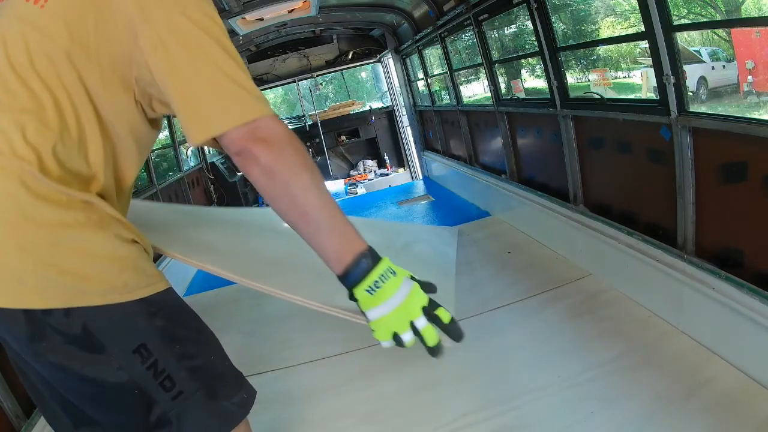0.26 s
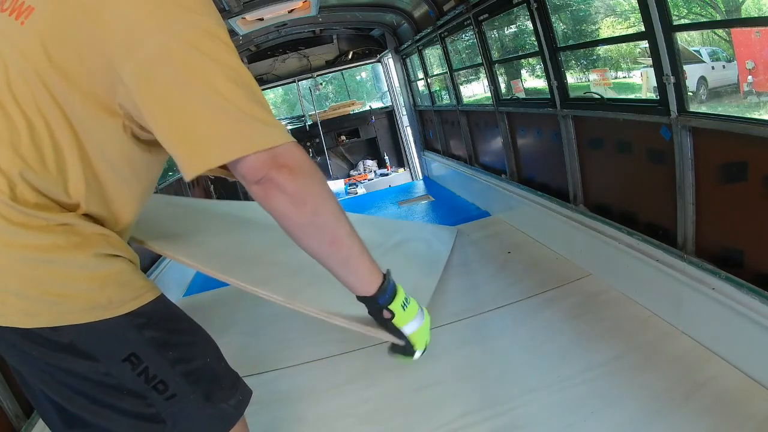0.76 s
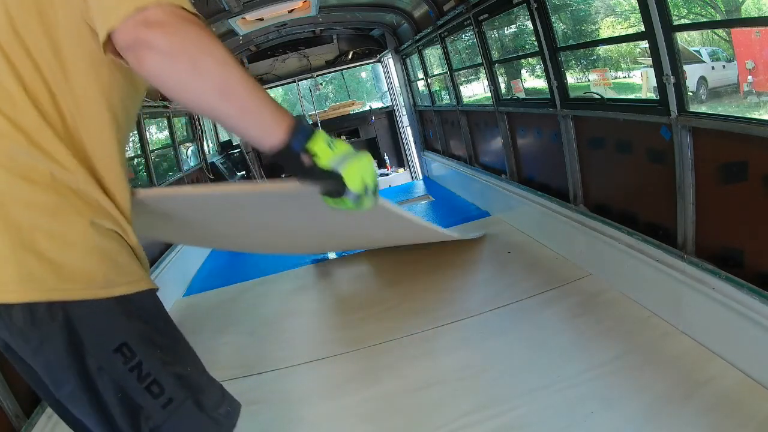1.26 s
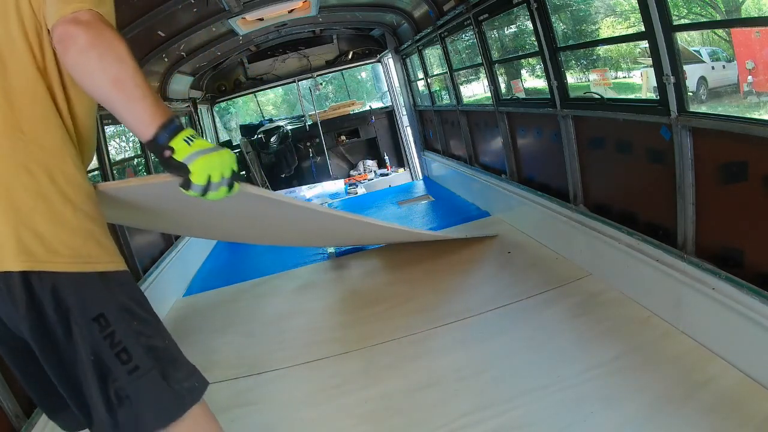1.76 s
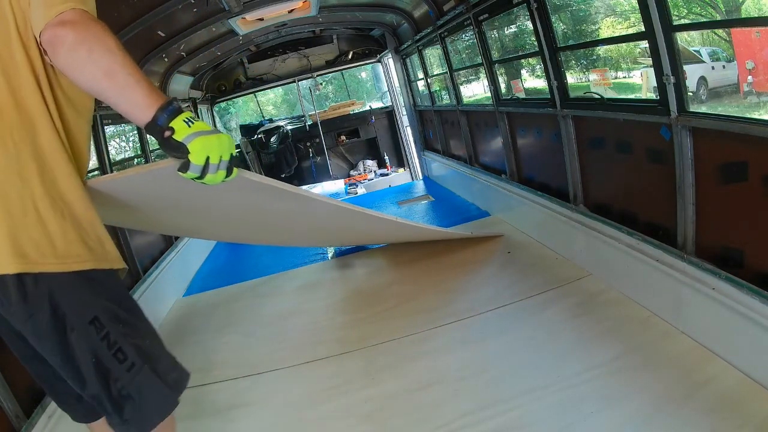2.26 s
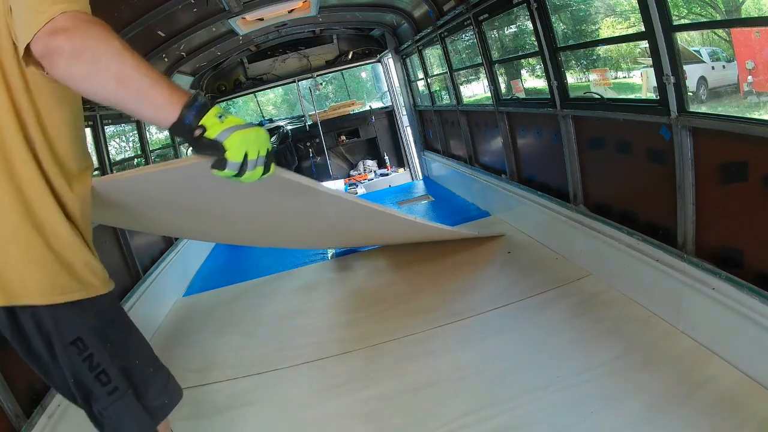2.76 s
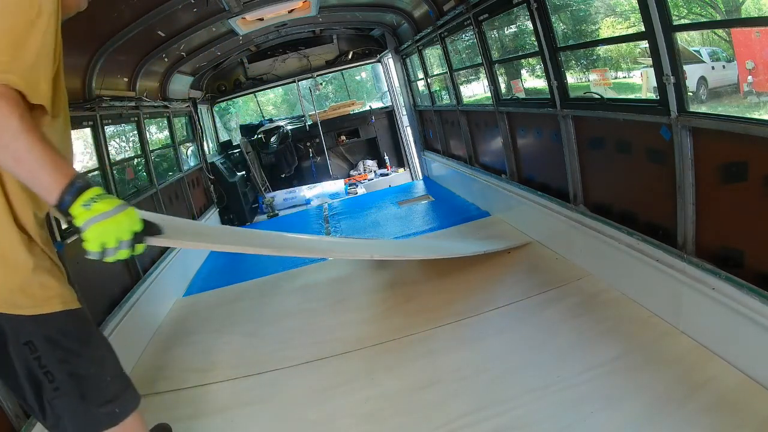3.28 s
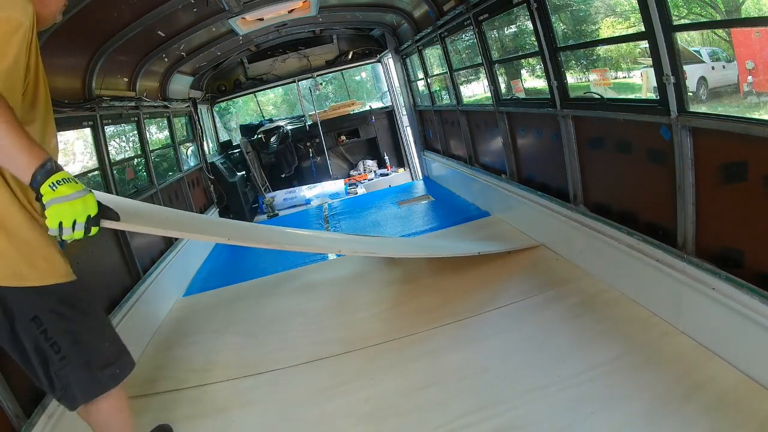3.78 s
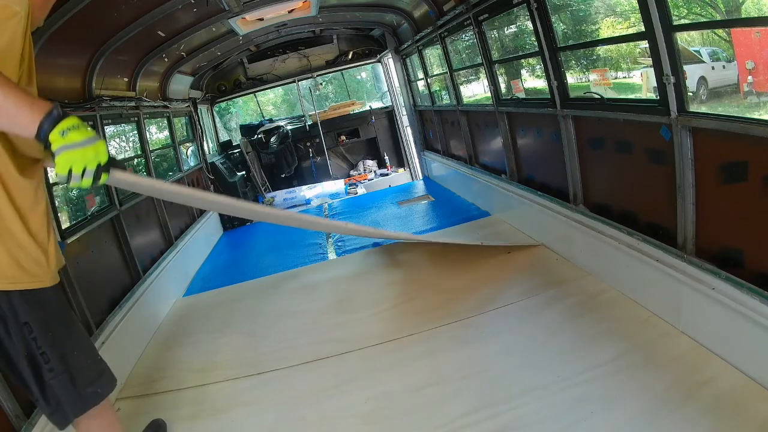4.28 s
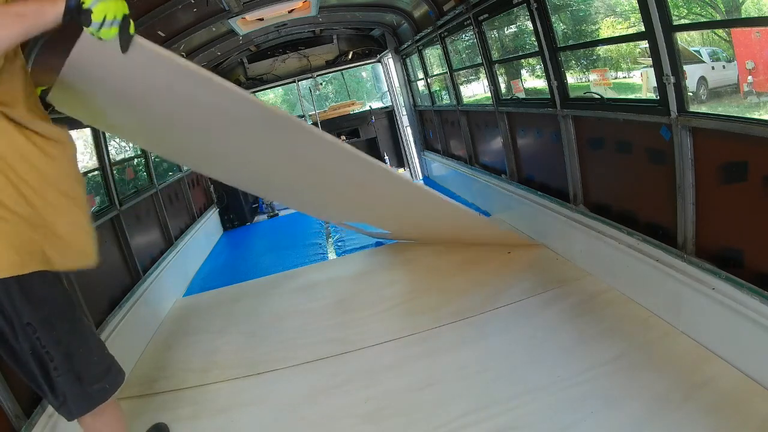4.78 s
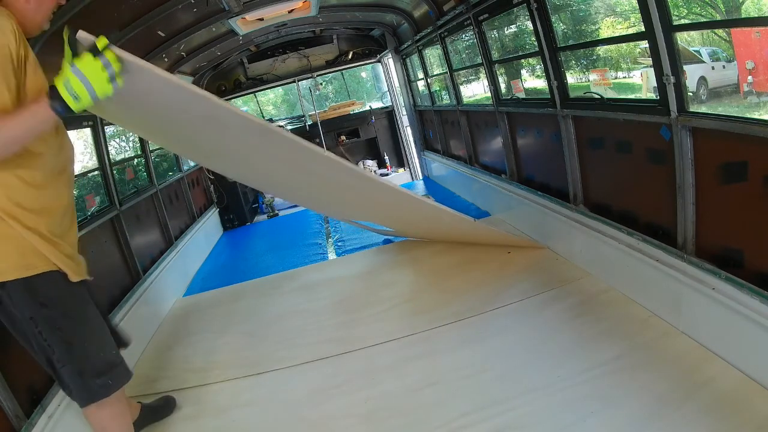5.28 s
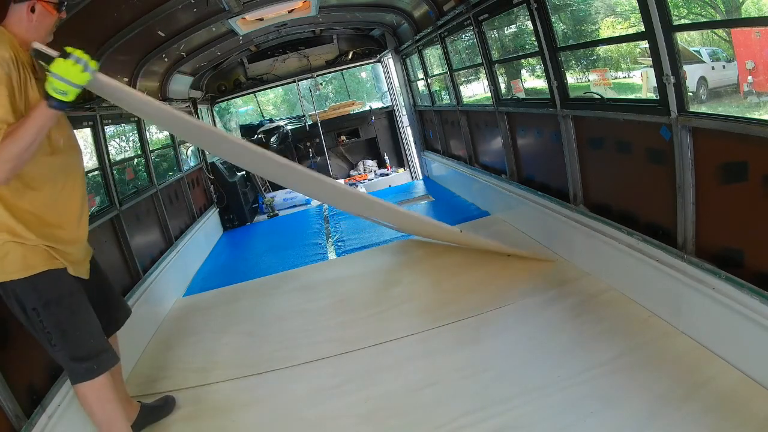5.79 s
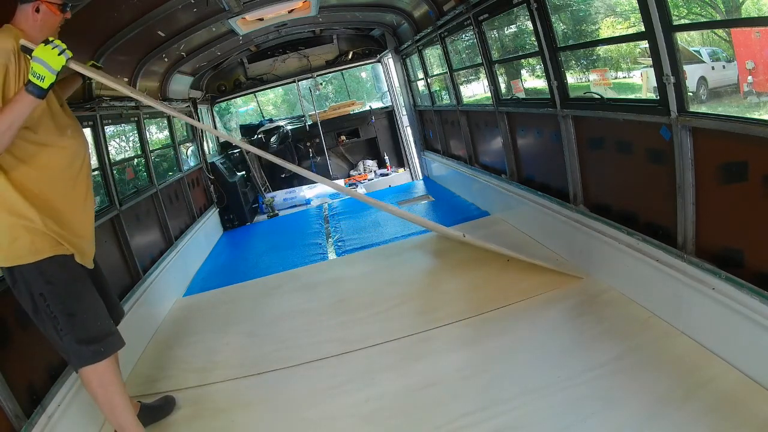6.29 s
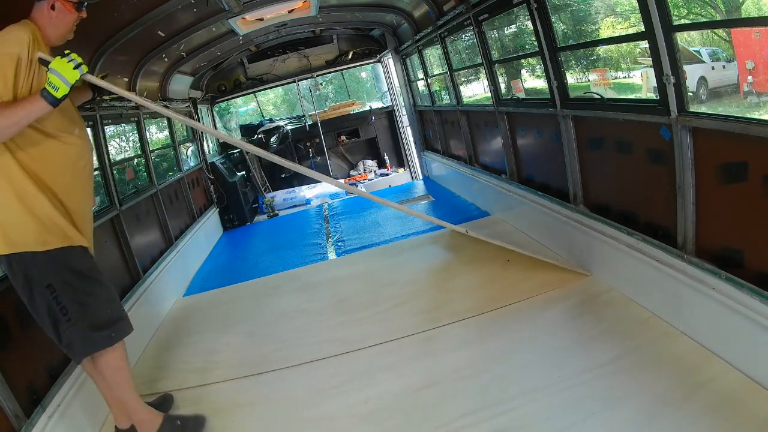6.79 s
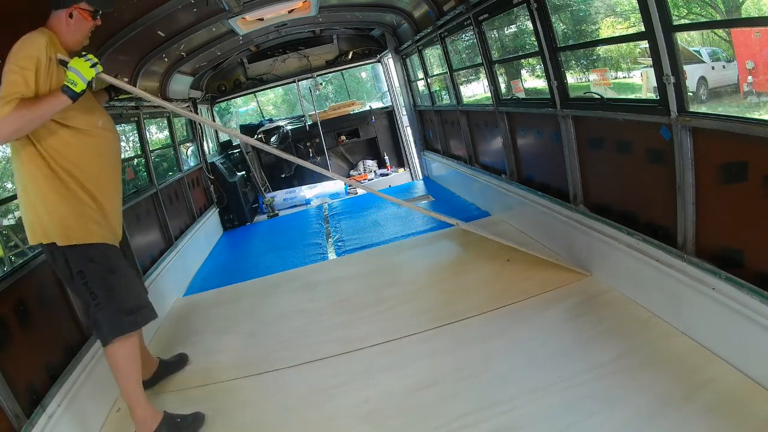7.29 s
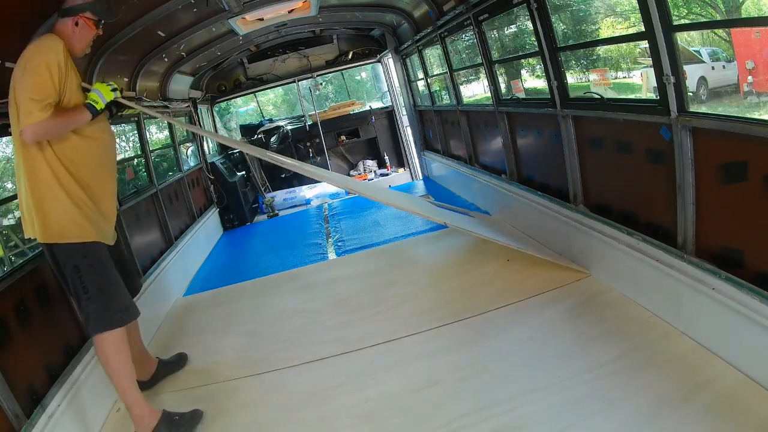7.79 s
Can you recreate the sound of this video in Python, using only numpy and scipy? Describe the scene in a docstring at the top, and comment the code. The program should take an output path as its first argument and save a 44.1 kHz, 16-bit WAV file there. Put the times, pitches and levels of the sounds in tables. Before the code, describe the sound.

A thin plywood sheet is worked across a plywood floor in a stripped steel bus, heard from a metre or two away, centred, with short dense reflections and a faint steady bed of air. For the first second there is only very light rubbing and a tiny gritty tick at 0.6. At about 1.2-1.3 the sheet lands with a fast chattering slap and a short scrape. Soft, uneven fibrous strokes continue to 3.0, when one swells into a muffled hollow thump at 3.3. It stays quiet until a scrape at 4.7 and small catches around 5.1. From 5.55 the loudest rubbing surges, with a solid knock at 5.8 and a deep thump and crackle at 6.0. Softer rubbing strokes follow, with snags near 6.95, wooden knocks at 7.2-7.35 and 7.65, and a faint last tap at 8.0.

```python
"""Fibrous rubbing in uneven strokes over a faint air bed, with slaps, knocks and soft low thumps among it.
A thin plywood sheet is bent and dragged over the plywood floor of a stripped bus, a metre or two away.
Random grains of contact, coloured and enveloped, make the rubbing; filtered contacts make the blows,
which ring the modes of sheet and floor. The bare steel cabin answers with short dense reflections."""
import sys
import numpy as np
from scipy import signal
from scipy.fft import rfft, irfft, next_fast_len
from scipy.io import wavfile
from scipy.ndimage import uniform_filter1d

SR = 44100
rng = np.random.default_rng(int(sys.argv[2]) if len(sys.argv) > 2 else 0)


def log_audio(samples):
    """Write samples as a 16-bit WAV file to the path given in sys.argv[1]."""
    # one column per channel
    frames = np.atleast_2d(samples).T
    # limit to full scale, then quantise
    limited = np.clip(frames, -1, 1)
    pcm = np.round(limited * 32767).astype(np.int16)
    wavfile.write(sys.argv[1], SR, pcm)


N = 355005
TIME = np.arange(N) / SR  # s

# Ringing modes of the sheet: mode_hz, relative_level_db, t60_s
SHEET_MODES = [(158, 0, 0.36), (212, -1.5, 0.083), (230.3, 6.5, 0.23), (291.5, -1.5, 0.32),
               (354.5, -7, 0.23), (395, 8, 0.074), (450, 1, 0.12), (553, 6, 0.031), (628, 6.5, 0.094),
               (730, 3, 0.065), (890, -2, 0.26), (1015, -9.5, 0.34), (1120, 3.5, 0.21), (1350, -32, 0.37),
               (1600, -12, .22), (1800, -7, .22), (1908, 2.5, 0.29), (2500, -14, 0.22), (2810, 13, .18),
               (3200, -10, .18)]


def undb(db):
    """Decibels to gain."""
    return 10 ** (np.asarray(db) / 20)


def unit(x):
    """Scale to an energy of one."""
    return x / np.sqrt(np.sum(x ** 2))


def colour(x, points):
    """Shape the spectrum of a steady sound by (Hz, dB) points, log-frequency interpolation; rms 1."""
    hz, db = np.transpose(points)
    size = next_fast_len(N)
    f = np.maximum(np.arange(size // 2 + 1) * SR / size, 1)
    gain = undb(np.interp(np.log(f), np.log(hz), db))
    shaped = irfft(rfft(x, size) * gain, size)[:N]
    return unit(shaped) * np.sqrt(N)


def cut(x, hz, kind, order=2):
    """Butterworth low-pass or high-pass."""
    sos = signal.butter(order, min(hz, SR / 2 - 1000), kind, fs=SR, output="sos")
    return signal.sosfilt(sos, x)


def add(track, start_s, x):
    """Mix x into the track from start_s, or from zero if that is negative."""
    i = max(int(start_s * SR), 0)
    track[i:i + len(x)] += x[:max(N - i, 0)]


def walk(rate_hz):
    """Random levels, each held 1 / rate_hz seconds, slewed twice; spread near 1."""
    k = int(SR / rate_hz)
    held = np.repeat(rng.standard_normal(N // k + 1), k)
    slewed = uniform_filter1d(uniform_filter1d(held, k), k)
    return np.sqrt(2) * slewed[:N]


def grains(size, per_s, spread_db):
    """Tiny contacts at random moments, of very unequal strength."""
    hit = rng.random(size) < per_s / SR
    contacts = rng.standard_normal(size) * hit
    contacts[hit] *= undb(spread_db * rng.standard_normal(size)[hit])
    return contacts


def through(x, response):
    """Pass a sound through an impulse response."""
    return signal.oaconvolve(x, response)[:N]


def ringing(modes, ring_db):
    """Impulse response of a panel: the contact itself plus exponentially decaying modes."""
    t = TIME[:SR]
    response = np.zeros(len(t))
    for hz, db, t60_s in modes:
        mode = np.cos(2 * np.pi * hz * t) * np.exp(-np.log(1000) * t / t60_s)
        response += undb(ring_db + db) * unit(mode)
    response[0] += 1
    return response


def disperse(x, travel=0.0695):
    """Bending waves cross the sheet in travel / sqrt(Hz) seconds: highs arrive first, bass trails."""
    f = np.fft.rfftfreq(len(x), 1 / SR)
    phase = 2 * np.pi * 2 * travel * np.sqrt(f)  # its slope is the delay
    return irfft(rfft(x) * np.exp(-1j * phase), len(x))


def cabin(low_t60_s=0.41, high_t60_s=0.25, wet_db=2.0, build_s=0.00026):
    """Dense reflections off the near walls of the bus, from one spot; the treble dies first."""
    t = TIME[:SR // 2]
    response = np.zeros(len(t))
    edges_hz = np.geomspace(40, 18000, 19)
    t60s = np.linspace(low_t60_s, high_t60_s, len(edges_hz))
    noise = rfft(rng.standard_normal(len(t)))
    f = np.fft.rfftfreq(len(t), 1 / SR)
    for lo, hi, t60_s in zip(edges_hz, edges_hz[1:], t60s):
        band = irfft(noise * ((f >= lo) & (f < hi)), len(t))
        band *= np.exp(-np.log(1000) * t / t60_s) * (1 - np.exp(-t / build_s))
        response += unit(band) * np.sqrt(2 * (hi - lo) / SR)  # energy in proportion to bandwidth
    return response * undb(wet_db)


def in_cabin(x, spot):
    """A sound and its reflections."""
    heard = signal.oaconvolve(x, spot)
    heard[:len(x)] += x
    return heard


def air(level_db=-61):
    """Steady coloured noise: faint outdoor air through the windows, and microphone hiss."""
    # Spectrum: freq_hz, relative_level_db
    air_colour = [(25, -18), (60, -12.5), (130, -2), (300, 4), (700, 2.5), (1400, 0), (3000, -2),
                  (8000, -10.5), (11000, -9.5), (16000, -12)]
    return colour(rng.standard_normal(N), air_colour) * undb(level_db)


def scuffs(spot, trim_db=-1, below=0.42, above=1.37, rise=0.28):
    """Grit and splinters catch: short bright bursts of crackle where the edge snags."""
    # Snags: start_s, level_db (before trim), centre_hz, decay_s (time constant)
    snags = [(0.618, -23.5, 9200, 0.0003), (.624, -25.5, 8800, 0.016), (3.31, -25, 7000, 0.01),
             (3.771, -20, 7300, 0.015), (5.156, -18.5, 7260, 0.0059), (5.994, -17, 4930, 0.0098),
             (6.949, -20.5, 3500, .005), (6.984, -21, 5000, 0.0066)]
    track, t = np.zeros(N), TIME[:SR // 4]
    for start_s, db, hz, decay_s in snags:
        envelope = np.exp(-t / decay_s) * (1 - np.exp(-t / (rise * decay_s)))
        crackle = grains(len(t), 5500, 3.3) * envelope
        snag = cut(cut(crackle, hz * below, "high", order=2), hz * above, "low", order=6)
        add(track, start_s, undb(db + trim_db) * unit(in_cabin(snag, spot)))
    return track


def thumps(spots, ring_db=-33, bass_hz=45):
    """The bowed sheet pushes softly on the hollow floor, then wobbles on, fainter and longer, a low shudder."""
    # Flexing or settling panel: start_s, level_db (before floor response), treble_corner_hz, decay_s
    flexes = [(1.273, -23, 115, 0.033), (2.059, -36, 298, 0.025), (3.315, -13.5, 430, 0.058),
              (3.33, -27, 120, .04), (3.821, -35.5, 200, 0.03), (4.951, -31, 250, .04),
              (5.994, -9.5, 615, 0.023), (6.025, -12, 293, 0.041)]
    # Hollow floor modes: mode_hz, relative_level_db, t60_s
    floor_modes = [(77, -2, 1), (118.2, -6, 0.85), (147.6, -10, 0.36), (244, 4.5, 0.15), (370, -3, 0.19)]
    wobble_re_thump_db, wobble_hz, wobble_s = -17.5, 133, 0.22
    track, t = np.zeros(N), TIME[:SR]
    for k, (start_s, thump_db, thump_hz, thump_s) in enumerate(flexes):
        thump = thump_db, thump_hz, thump_s
        wobble = thump_db + wobble_re_thump_db, wobble_hz, wobble_s
        for db, treble_hz, decay_s in (thump, wobble):
            shudder = grains(len(t), 1100, 2.8) * np.exp(-t / decay_s)
            push = cut(cut(shudder, treble_hz, "low", order=4), treble_hz / 2, "high", order=1)
            add(track, start_s, undb(db) * unit(in_cabin(push, spots[k % len(spots)])))
    return through(cut(track, bass_hz, "high", order=1), ringing(floor_modes, ring_db))


def knocks(spots, trim_db=2, ring_db=-31):
    """The long edge lands and chatters; each strike has its own loudness, brightness, bass and chatter."""
    # Edge strikes: start_s, level_db (before trim and ringing), treble_corner_hz, bass_corner_hz,
    # chatter_db (re first touch)
    strikes = [(1.208, -26.5, 700, 200, 2), (1.236, -22, 1000, 400, 21), (1.271, -5, 1000, 165, 4),
               (1.281, -2.5, 2190, 195, 6), (1.292, -0.5, 1520, 610, 11.5), (1.374, -24, 1000, 210, -10),
               (3.767, -29, 603, 430, 2), (4.112, -27, 4000, 700, 4), (5.135, -28, 600, 250, 7),
               (5.165, -28.5, 900, 300, -8), (5.22, -29, 700, 400, -10), (5.779, -2, 1860, 180, 3),
               (5.992, -11.5, 1520, 500, 2), (6.809, -23, 940, 420, 1), (7.144, -24.5, 804, 280, 8),
               (7.211, -13.5, 2200, 324, -11), (7.332, -8, 1880, 162, 2.5), (7.36, -12.5, 800, 260, 3),
               (7.632, -7, 2600, 174, -1.5), (7.674, -20.5, 796, 135, 18), (8.034, -19, 736, 278, 11)]
    chatter_s = 0.014  # decay time constant
    crack_db, crack_hz = -4.5, 5200  # re blow before sharpness scaling; upper corner
    hard_hz = 2000  # treble corner of a hard blow
    track, t = np.zeros(N), TIME[:SR // 4]
    touch = signal.unit_impulse(len(t))
    for k, (start_s, db, treble_hz, bass_hz, chatter_db) in enumerate(strikes):
        chatter = unit(grains(len(t), 3000, 2.3) * np.exp(-t / chatter_s))
        force = disperse(touch + undb(chatter_db) * chatter)
        blow = cut(cut(force, treble_hz, "low", order=3), bass_hz, "high", order=5)
        crack = cut(cut(touch, crack_hz, "low", order=6), treble_hz, "high", order=1)
        # bright blows with little chatter crack most
        sharpness = treble_hz / (treble_hz + hard_hz) / np.hypot(1, undb(chatter_db))
        contact = unit(blow) + undb(crack_db) * sharpness * unit(crack)
        add(track, start_s, undb(db + trim_db) * unit(in_cabin(contact, spots[k % len(spots)])))
    return through(track, ringing(SHEET_MODES, ring_db))


def strokes():
    """Envelopes of rubbing, hiss and drone: each stroke sets in, swells or eases, and coasts to a stop."""
    # Pushes and pulls of the edge: start_s, length_s, mid_level_db (before layer trims),
    # swell_db (start to end), hiss_db and drone_db (re rubbing, before layer trims)
    moves = [(-0.055, .3, -63, 1.5, 2, -5.5), (.25, .15, -71, -4, 2, -1), (0.622, 0.17, -65.5, -7, -3, -6),
             (0.782, 0.38, -56.5, 4.5, 0.5, -5.5), (1.194, 0.17, -41, -10, -9, 1.5),
             (1.313, 0.2, -50.5, -11, -4.5, -6), (1.493, 0.33, -60, -10, -4.5, -5.5),
             (1.779, 0.18, -51.5, 2, -5.5, -6), (1.982, 0.056, -54, 1.5, 2, -5),
             (2.131, .1, -51, -4, 1, -4), (2.25, .1, -63, -2, -5, -1), (2.452, 0.31, -58.5, 6.5, -4, -5.5),
             (2.752, 0.37, -49.5, -0.5, -5.5, -1), (3.065, 0.26, -44.5, 12, -6.5, -6.5),
             (3.366, .1, -49, 0, -4, -8), (3.538, 0.033, -54.5, 1, 2.5, -6), (3.88, 0.2, -67.5, 9, -0.5, 3),
             (4.06, 0.35, -60, 4, -4.5, -3.5), (4.473, 0.25, -64.5, 10, -3.5, -7),
             (4.684, .23, -47, -6, -6, -1), (4.93, .08, -59, 0, -4, -5), (5, 0.07, -50, -2.5, 1, -2.5),
             (5.099, 0.073, -46.5, -3, -5, -1.5), (5.229, 0.15, -55.5, -9, -2, -8),
             (5.39, 0.19, -66, 9, -3, -1), (5.549, 0.25, -39, 5.5, -6, -4),
             (5.78, 0.22, -32.5, -3.5, -6.5, -8.5), (6.147, 0.31, -53.5, -4, -4.5, -4.5),
             (6.396, 0.23, -47.5, 1.5, -4, -2), (6.658, 0.11, -58, 7, -2, -4.5),
             (6.756, 0.22, -51.5, -2.5, -1, -2.5), (7.005, 0.35, -51, 10.5, -4.5, 0),
             (7.332, .39, -50, -1, -2, -3), (7.703, 0.42, -54, 5, -.5, -6)]
    attack_s, release_s = 0.064, 0.037
    creep_db = [-73, -71, -73]  # rubbing, hiss, drone, before trims: the edge never quite rests
    power = np.outer(undb(creep_db) ** 2, np.ones(N))
    for start_s, length_s, db, swell_db, hiss_db, drone_db in moves:
        t = TIME[:SR] + max(-start_s, 0)  # a negative start is already under way
        shape = np.clip(t / attack_s, 0, 1) * np.exp(-np.maximum(t - length_s, 0) / release_s)
        swell = swell_db * (np.clip(t / length_s, 0, 1) - 0.5)
        strength = shape * undb(db + swell)
        for layer, share in zip(power, undb([0, hiss_db, drone_db])):
            add(layer, start_s, (strength * share) ** 2)
    return np.sqrt(power)


def sliding(spots, catch_db=1.07, rub_trim_db=-3.5, hiss_trim_db=-3.5, drone_trim_db=-7.0):
    """Wood fibres catch and let go thousands of times a second; a pressed edge shakes the whole panel."""
    # Spectra of the rubbing, its fine hiss and the shaken panel: freq_hz, relative_level_db
    rub_colour = [(150, -53), (500, -13.5), (1000, -2.5), (1800, 1), (3400, 2.5), (4400, -2.5), (6000, -10),
                  (9000, -12), (13000, -57)]
    hiss_colour = [(2000, -31), (4500, 0.5), (6300, 1.5), (8400, 3), (9600, -1), (11000, -10.5),
                   (13000, -25), (16000, -57)]
    drone_colour = [(60, -23), (130, -13.5), (230, -4), (360, -1.5), (480, 1), (620, 6.5), (1000, 3),
                    (1600, -0.5), (3500, -26)]
    rub_level, hiss_level, drone_level = strokes() * undb(catch_db * walk(45))  # drag is never quite even
    shaken = through(grains(N, 3000, 2.8), ringing(SHEET_MODES, ring_db=-38))
    panel = colour(shaken, drone_colour) * drone_level * undb(drone_trim_db)
    track = in_cabin(panel, sum(spots) / np.sqrt(len(spots)))
    for spot in spots:  # each spot rubs on its own and has its own reflections
        rub = colour(grains(N, 3000, 2.5), rub_colour) * rub_level * undb(rub_trim_db)
        hiss = colour(grains(N, 7000, 2.5), hiss_colour) * hiss_level * undb(hiss_trim_db)
        track += in_cabin(rub + hiss, spot) / np.sqrt(len(spots))
    return track[:N]


def scene(count=6):
    """All sources, from a few spots along the edge in one cabin, over the air; alike in both channels."""
    spots = [cabin() for _ in range(count)]
    mono = air() + scuffs(spots[0]) + thumps(spots) + knocks(spots) + sliding(spots)
    return np.array([mono, mono])


def record(dry, top_hz=15750):
    """Steep elliptic low-pass: the extreme treble is cut."""
    return signal.sosfilt(signal.ellip(10, 0.1, 70, top_hz, fs=SR, output="sos"), dry)


dry = scene()
out = record(dry)
log_audio(out)
```